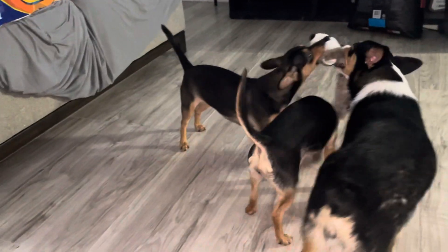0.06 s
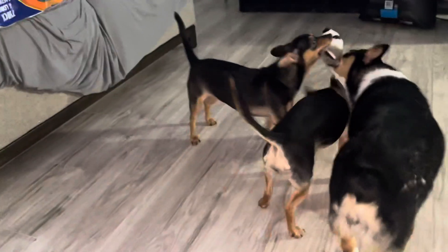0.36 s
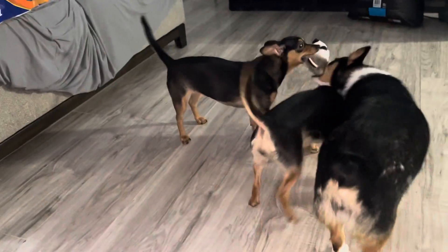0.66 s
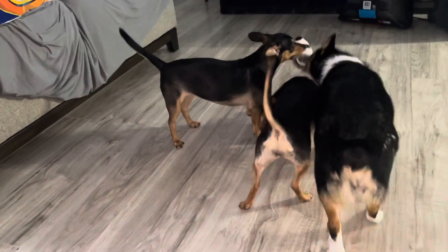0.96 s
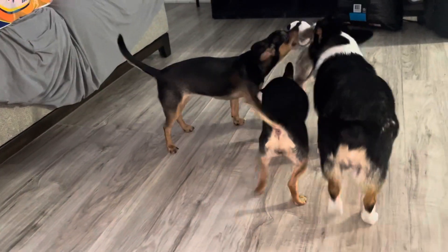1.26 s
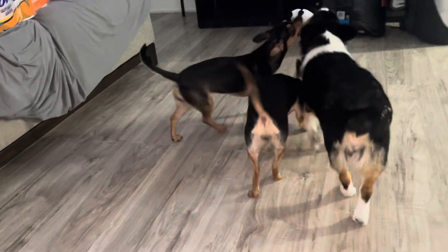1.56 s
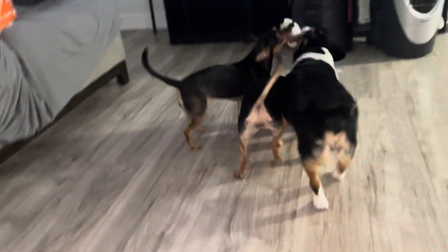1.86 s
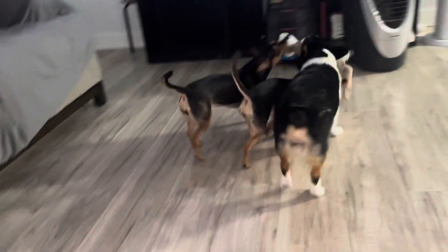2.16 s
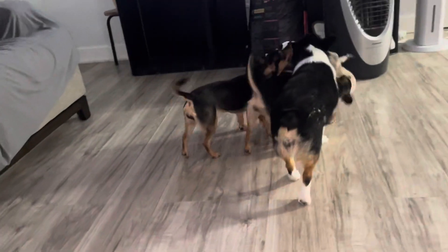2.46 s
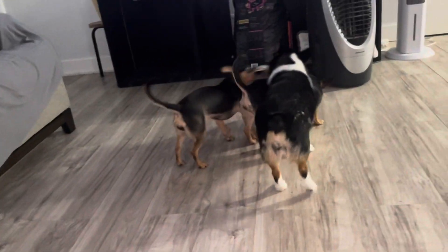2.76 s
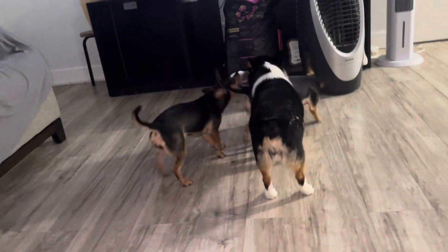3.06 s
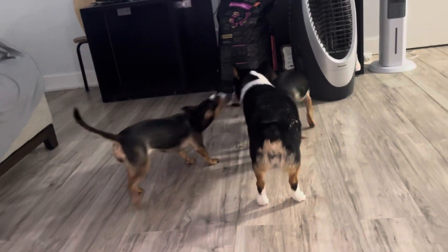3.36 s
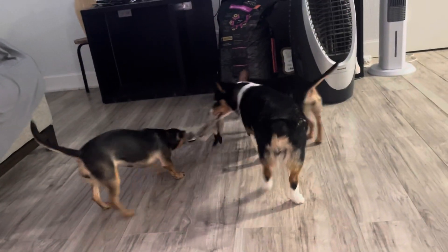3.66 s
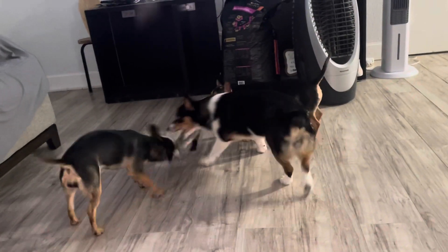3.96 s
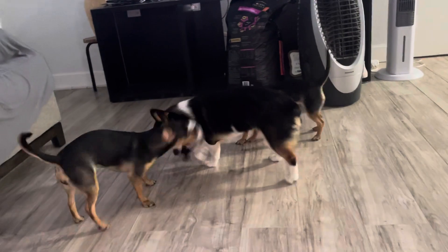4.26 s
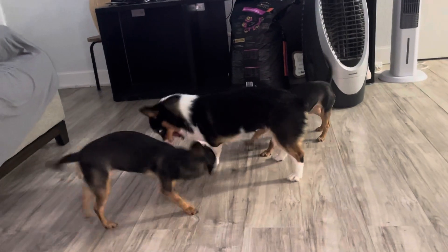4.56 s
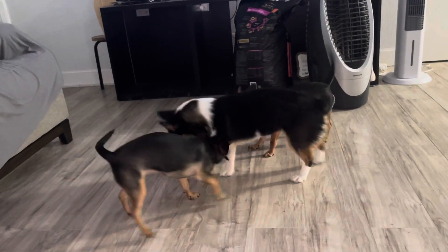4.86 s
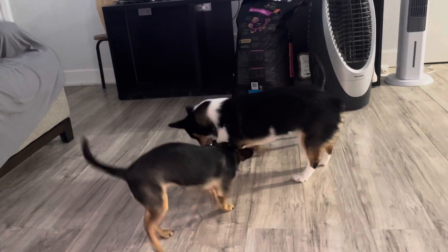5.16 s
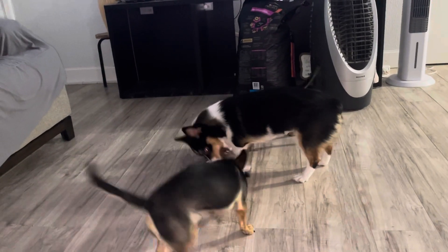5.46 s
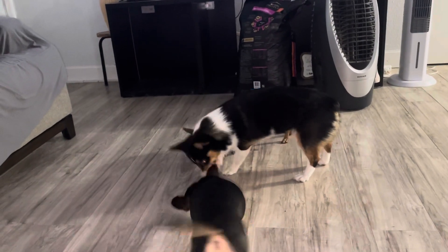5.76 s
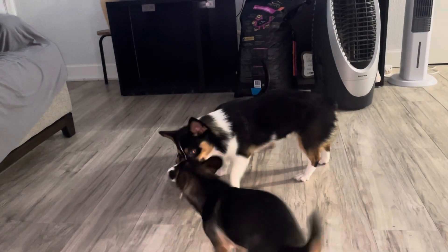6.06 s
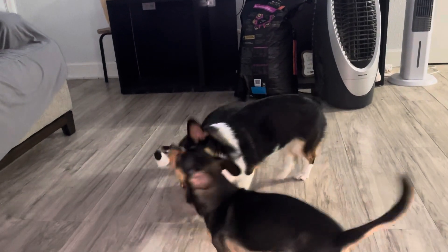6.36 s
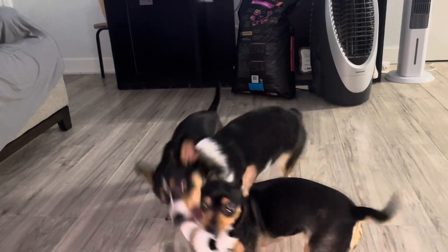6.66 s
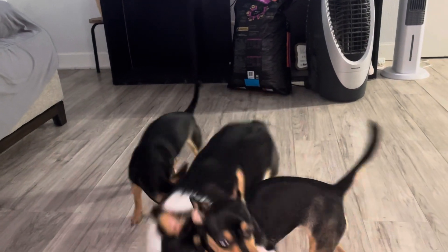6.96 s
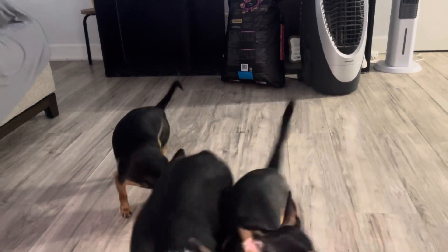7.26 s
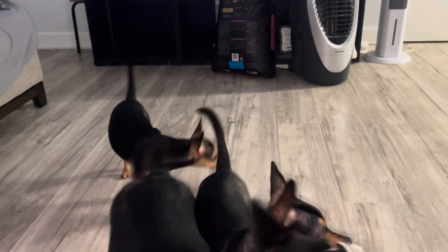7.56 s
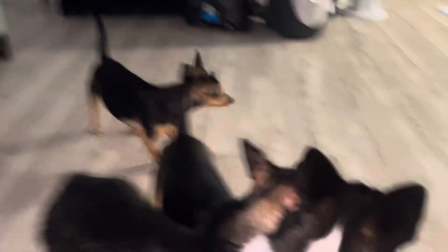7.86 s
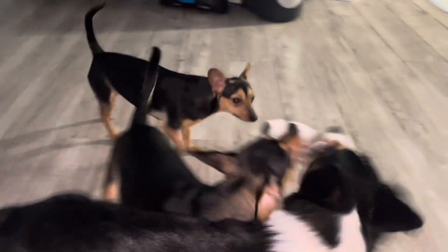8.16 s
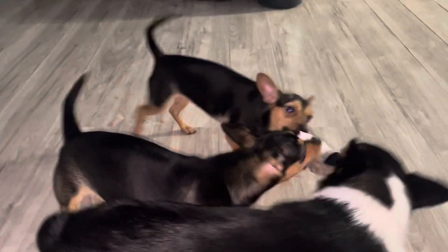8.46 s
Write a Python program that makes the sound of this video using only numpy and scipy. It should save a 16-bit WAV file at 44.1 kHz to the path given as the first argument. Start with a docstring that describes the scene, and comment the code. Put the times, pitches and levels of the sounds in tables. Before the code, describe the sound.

Small dogs' claws tick and skid on a laminate floor as they tug a toy, with one gruff bark over a faint fan hum.

```python
"""Claws tick and skid on a laminate floor as three small dogs tug at a toy.
Nails ring and boards knock at each step, dragged paws stick and slip, paws bump and a pad squeaks.
One dog gives a gruff, snorting bark, its throat chopping a blast of air; faint moans pass closed jaws.
Fur crackles, a soft rustle and a low, throbbing rumble come and go, and a fan hums behind them.
The small room rings briefly, heard through two microphone ports."""
import sys
import numpy as np
from scipy import signal
from scipy.fft import rfft, irfft, next_fast_len
from scipy.io import wavfile
from scipy.ndimage import uniform_filter1d

SR = 44100
rng = np.random.default_rng(int(sys.argv[2]) if len(sys.argv) > 2 else 0)


def transcribe(u):
    """Save the signal u as a 16-bit wav file named by the first command-line argument.

    u: samples, shape (n,) or (channels, n), limited to [-1, 1]; the rate is SR.
    q: integer samples, one column per channel.
    """
    v = np.clip(np.atleast_2d(u).T, -1, 1)
    q = np.round(v * 32767).astype(np.int16)
    wavfile.write(sys.argv[1], SR, q)


N = 380004


def gain_of(db):
    """Decibels to amplitude."""
    return 10 ** (np.asarray(db) / 20)


def unit_rms(x):
    """Scales to an rms of one."""
    return x / np.sqrt(np.mean(x ** 2) + 1e-20)


def drift(count, *windows):
    """Slow noise of unit rms, smoothed over each window length in samples."""
    x = rng.standard_normal(count)
    for size in windows:
        x = uniform_filter1d(x, size)
    return unit_rms(x)


def at_hz(points, hz):
    """Interpolates rows of (Hz, value) on a log frequency axis."""
    f, value = np.transpose(points)
    return np.interp(np.log(hz + 1), np.log(f + 1), value)


def envelope(points):
    """Rows of (s, dB) to a gain per sample."""
    s, db = np.transpose(points)
    return gain_of(np.interp(np.arange(N) / SR, s, db))


def add(mix, start_s, sound):
    """Mixes a sound in at start_s."""
    part = mix[max(round(start_s * SR), 0):][:len(sound)]
    part += sound[:len(part)]


def colour(x, spectrum, size=4096):
    """Causal filter from rows of (Hz, relative dB); white noise keeps its power."""
    log_gain = np.log(gain_of(at_hz(spectrum, abs(np.fft.fftfreq(size, 1 / SR)))))
    taps = np.fft.ifft(np.exp(np.conj(signal.hilbert(log_gain)))).real
    return signal.oaconvolve(x, taps / np.linalg.norm(taps))[:len(x)]


def resonate(x, hz, width_hz, stages=1):
    """Unity-gain resonators in series; the centre may move."""
    carrier = np.exp(2j * np.pi * np.cumsum(hz * np.ones(len(x))) / SR)
    pole = np.exp(-np.pi * width_hz / SR)
    for _ in range(stages):
        x = 2 * (carrier * signal.lfilter([1 - pole], [1, -pole], x / carrier + 1e-18)).real
    return x


# Each row: time in seconds, tick level in dB, nail ring in Hz, knock and crack in dB re tick,
# skid level in dB, fizz in dB re skid. The players add their own trims.
PAW_STEPS = [(.106, -51.5, 6760, -7, 8.5, -50.5, -13), (.388, -47, 6800, -14, -6, -62, -4),
             (.394, -40.5, 7350, -6, -1.5, -46.5, -2.5), (0.509, -39, 7350, -8, -11, -46, -2),
             (.625, -46, 7900, -4, -2, -48, -8), (.713, -51, 8550, -10, -2, -61, 7),
             (0.935, -42, 8440, -15, 3, -52, -10), (0.948, -45.5, 9000, -17, 7, -50, -8),
             (0.953, -41, 6500, 1.5, 2, -58, -10), (0.988, -38, 8800, -1, -2, -46.5, 3),
             (1.004, -36, 8550, -3, -5, -69, 0), (1.094, -47, 4500, -6, -14, -66, -12),
             (1.167, -50, 7550, -12, -1, -61, -2), (1.390, -43, 6940, -5, 4, -46.5, -5),
             (1.431, -44, 7000, -16, -10, -55, -1), (1.564, -36, 7900, -7.5, 0, -42.5, -8),
             (1.635, -39, 6440, -8, -11, -49, -14), (1.658, -48, 6030, -14, -14, -49, -12),
             (1.866, -48, 6500, -14, -4, -53, -10), (1.904, -35.5, 6500, -7, -0.5, -44, -16),
             (2.244, -44, 6960, -10, -11, -54, -16), (2.358, -37, 6030, -14, -14, -64, -10),
             (2.371, -42, 6240, -9, -1, -74, -9), (2.45, -45, 5800, -16, -20, -62, -14),
             (2.613, -33.5, 6060, -12, -24, -45, -17), (2.986, -39, 6340, -9, -8, -56, -8),
             (2.989, -31.5, 5500, -13, -10, -46, -12), (3.005, -43, 6200, -16, -8, -58, -10),
             (3.042, -35.5, 6100, -22, -23, -56, -10), (3.195, -37.5, 5600, -10, -21, -45, -16),
             (3.274, -41, 5960, -20, -16, -56, -12), (3.290, -29.5, 6200, -22, -15, -49.5, 0),
             (3.297, -35.5, 5770, -18, -8, -54, 1), (3.374, -44, 6700, -20, -14, -64, -10),
             (3.387, -39, 7700, -7, -2, -46, -9), (3.439, -43, 6500, -16, -6, -64, -8),
             (3.493, -32.5, 6040, -23, -11, -41, -6), (3.734, -41, 5800, -18, -16, -67, -10),
             (3.751, -34.5, 6200, -9, -5.5, -49, -3), (4.076, -36, 7040, -9, -12, -47.5, 0),
             (4.234, -47, 6200, -20, -8, -74, -11), (4.265, -32, 6840, -12, -16, -42.5, -8),
             (4.268, -30.5, 5950, -8, -11, -47.5, -6), (4.393, -40.5, 6070, -12, -0.5, -44, -9),
             (4.553, -37.5, 7200, -2.5, 3, -55, -4), (4.654, -33.5, 6800, -22, -16, -54, 4),
             (4.748, -34, 6430, -22, -11, -49, -5), (4.755, -43, 5800, -18, -12, -58, -8),
             (4.772, -36.5, 5600, -13, -7, -46, -10), (5.173, -33, 6400, -16, -20, -44, -9),
             (5.182, -35, 7260, -20, 4, -59, -2), (5.197, -35.5, 7100, -7, 1, -42, 0.5),
             (5.350, -48, 7500, -8, 11.5, -43.5, -2.5), (5.548, -39.5, 5700, -7, -18, -45, -20),
             (5.576, -40, 5350, -18, -10, -53, -10), (5.593, -38.5, 7300, -6, 1, -45, 4.5),
             (5.603, -45, 9700, -10, -2, -56, -2), (5.934, -45, 5960, -10, -7, -59, -6),
             (6.09, -34.5, 10800, -7, -6, -43.5, 1), (6.096, -35, 9700, -6, -2, -59, -1),
             (6.245, -46.5, 8550, -11, 9, -62, 4), (6.395, -40, 9600, -18, 0, -62, -11),
             (6.408, -22.5, 8360, -21, -1, -41, 2), (6.419, -43, 5200, -14, -12, -49, -4),
             (6.488, -44, 6860, -13, -2, -42.5, -6), (6.547, -30.5, 8400, -2, -4, -41, 2.5),
             (6.615, -50, 10100, -10, 4, -56, -2), (6.647, -52, 9500, -14, 9, -68, -3),
             (6.798, -44.5, 9100, -20, 1, -45, -6), (6.863, -41.5, 7400, -9, 8, -42.5, -6),
             (6.893, -44, 7900, -5, 1, -52.5, 5), (6.971, -46, 5800, -14, -12, -64, -10),
             (7.071, -42.5, 10600, -15, 2, -60, 1), (7.078, -46, 10500, -14, 6, -55, 0),
             (7.142, -39.5, 9500, 4, 3, -52, 14), (7.379, -41.5, 6100, -6, 1, -42, -4),
             (7.391, -41.5, 7000, -14, 7, -48, -13), (7.781, -51, 7700, 1, 3, -51, -2),
             (7.812, -52, 5960, -1, -6, -54, -1), (8.143, -54, 8050, -4, 9, -49.5, -5),
             (8.22, -49, 5500, -3, -1, -44.5, -9), (8.239, -47, 6000, -13, -3, -56, -2),
             (8.308, -45, 7650, 0, -8, -44, 2.5), (8.422, -37, 4260, 0.5, -15, -46.5, -19)]
# Each row: frequency in Hz, relative level in dB.
CRACK_SPECTRUM = [(500, -15), (3000, -4), (5000, 7), (10500, 6.5), (13500, -2), (16000, -0.5)]


def claws(trim_db=-1.5, knock_trim_db=-4, knock_s=0.0011, ring_q=5.5):
    """Claws graze, snap down and chatter. Returns the nail and board ring, and the stereo crack."""
    chatter, graze_s, chatter_s = 0.17, 0.0006, 0.0012
    ring, cracks = np.zeros(N), np.zeros((2, N))
    t = np.arange(-96, 1024) / SR
    touch = np.exp(np.minimum(t / graze_s, -t / chatter_s))
    tick_norm = np.sqrt(SR / 440)  # energy of 2.3 ms at unit rms
    for s, db, hz, knock_db, crack_db in claw_hits():
        skips, wood = rng.standard_normal((2, len(t)))
        lean_db = rng.uniform(-1.19, 1.645)  # each claw lands at its own place
        # a blunt claw cracks less and chatters more
        contact = (t == 0) + chatter * gain_of(-crack_db) * skips * touch
        nail = resonate(contact, hz, hz / ring_q, stages=2)
        crack = colour(contact, CRACK_SPECTRUM, size=512)
        knock = colour(wood * (t >= 0) * np.exp(-abs(t) / knock_s), SCUFF_SPECTRUM, size=512)
        routes = [(ring, nail, 0), (ring, knock, knock_db + knock_trim_db),
                  (cracks[0], crack, crack_db + lean_db), (cracks[1], crack, crack_db - lean_db)]
        for mix, part, part_db in routes:
            add(mix, s + t[0], tick_norm * gain_of(db + trim_db + part_db) * part / np.linalg.norm(part))
    return ring, cracks


def claw_hits(lag_s=0.009, second_db=-17, detune=0.037):
    """Each step lands one claw, then a lighter one."""
    for s, db, hz, knock_db, crack_db, _, _ in PAW_STEPS:
        late, sharp = rng.uniform(-1, 1, 2)
        yield s, db, hz, knock_db, crack_db
        yield s + lag_s * (1 + late / 2), db + second_db, hz * (1 + detune * sharp), knock_db, crack_db


# Each row: peak time in seconds, length in seconds, level in dB, scuff and fizz in dB re that level.
PAW_DRAGS = [(0.771, 0.073, -48, -5, -6), (.905, 0.051, -53, -12, -4), (1.08, 0.17, -47, -7, -24),
             (1.213, 0.097, -47.5, -3.5, -1), (1.721, 0.078, -38, -5, -1.5), (1.962, 0.071, -43, -16, -5),
             (2.106, 0.12, -46.5, -5, -8), (2.299, 0.29, -44.5, -8.5, -10), (2.665, 0.057, -51.5, -3, -16),
             (3.157, 0.04, -48, -18, -9), (3.49, .026, -40, -24, -14), (3.696, 0.099, -42, -23, -11),
             (3.936, 0.029, -53, -8, -4), (4.012, 0.14, -41, -10, -32), (4.462, 0.063, -48.5, -5, -3),
             (4.62, 0.18, -41, -14, -7), (4.835, 0.045, -50, -16, -14), (5.05, 0.035, -52, -5, -12),
             (5.107, .035, -59, -12, 7), (5.159, 0.034, -49, -16, -19), (5.495, 0.086, -47.5, -9, -4),
             (5.786, 0.048, -41.5, -11, 0), (5.952, 0.026, -45.5, -17, -9), (6.007, .025, -47.5, -16, -14),
             (6.085, 0.071, -42, -27, -18), (6.186, 0.072, -47, -20, -10), (6.261, 0.078, -46.5, -11, -4),
             (6.761, 0.024, -49, -11, -21), (7.036, 0.13, -49, -6.5, -6), (7.167, 0.079, -42, -24, -4),
             (7.228, 0.15, -49, 4.5, -23), (7.443, .07, -52, 2, -8), (7.574, 0.11, -40.5, 3, -4),
             (7.825, 0.043, -43, -1.5, -19), (8.196, 0.041, -53, -12, -8), (8.347, 0.087, -48, -3.5, -5),
             (8.454, 0.1, -43, -29, -11)]


def strokes(skid_rise_s=0.0016, skid_fall_s=0.034, rise_share=0.42):
    """A short skid after each step, then the longer drags. A heavier knock scuffs more."""
    for s, _, _, knock_db, _, skid_db, fizz_db in PAW_STEPS:
        yield s + skid_rise_s, skid_rise_s, skid_fall_s, skid_db, knock_db, fizz_db
    for peak_s, length_s, db, scuff_db, fizz_db in PAW_DRAGS:
        yield peak_s, length_s * rise_share, length_s * (1 - rise_share), db, scuff_db, fizz_db


# Bright skid, dull scuff and fine fizz. Each row: frequency in Hz, relative level in dB.
SKID_SPECTRUM = [(500, -58), (1500, -36), (2400, -16), (3400, -2.5), (4100, 1.5), (4900, 5), (5900, 1),
                 (6800, 5), (8300, -7), (10000, -4), (13000, -20.5), (16000, -39.5)]
SCUFF_SPECTRUM = [(150, -41), (700, 8.5), (1500, 3), (2300, 11), (3200, 8), (5000, -26), (12000, -53)]
FIZZ_SPECTRUM = [(3000, -7), (7000, -4.5), (9500, 11), (11500, 5), (13500, 0), (15000, -8.5)]


def scrapes(edge_db=-10, skid_trim_db=-3, scuff_trim_db=-3, fizz_trim_db=-4):
    """Claws and pads stick and slip over the grain, swelling and easing with each stroke."""
    forces = np.zeros((3, N))
    for peak_s, rise_s, fall_s, db, scuff_db, fizz_db in strokes():
        t = np.arange(-rise_s, fall_s, 1 / SR)
        swell_db = np.interp(t, [-rise_s, 0, fall_s], [edge_db, 0, edge_db])
        stroke = gain_of(db + swell_db) * signal.windows.tukey(len(t), 0.08)
        bands_db = skid_trim_db, scuff_db + scuff_trim_db, fizz_db + fizz_trim_db
        for force, band_db in zip(forces, bands_db):
            add(force, peak_s - rise_s, stroke * gain_of(band_db))
    catch_db = 0.94 * drift(N, 260)  # the pad catches every few milliseconds
    skid, scuff, fizz = forces * unit_rms(grit(per_s=900, spread_db=2) * gain_of(catch_db))
    friction = colour(skid, SKID_SPECTRUM) + colour(scuff, SCUFF_SPECTRUM) + colour(fizz, FIZZ_SPECTRUM)
    return nail_rings(skid) + friction


def grit(per_s, spread_db):
    """Tiny slips of uneven size over an even hiss."""
    slips = (rng.random(N) < per_s / SR) * rng.standard_normal(N)
    slips *= gain_of(spread_db * np.minimum(rng.exponential(1, N), 3))
    return unit_rms(unit_rms(slips) + rng.standard_normal(N))


def nail_rings(drive, gain_db=8.5, modes_hz=(4750, 6200), wander=0.132, width_hz=130):
    """Dragged nails ring in narrow bands that wander as the grip shifts."""
    centres_hz = [hz * (1 + wander * drift(N, 2000, 1000)) for hz in modes_hz]
    return gain_of(gain_db) * sum(resonate(drive, hz, width_hz) for hz in centres_hz)


# Each row: time in seconds, effort in dB, flap rate in Hz, mouth opening as a factor on the formants.
BARK_CONTOUR = [(7.534, -43, 128.6, 0.95), (7.561, -42, 130.4, 1.02), (7.565, -26.5, 130.8, 0.93),
                (7.585, -31.5, 117.8, 1.015), (7.605, -28.5, 124.7, 1.09), (7.623, -32, 116, 0.995),
                (7.653, -38.5, 100.7, 0.93), (7.723, -47, 90.4, 0.95)]
# Each row: centre in Hz, width in Hz, gain in dB.
THROAT_FORMANTS = [(215, 200, -2.5), (330, 120, 1.5), (560, 110, 0.5), (997, 118, 6.5), (1166, 210, 2),
                   (2190, 340, 0), (3770, 1040, -6.5), (5060, 1900, -10.5)]


def bark(rough=0.79, jitter=0.2, puff_cycles=0.64, trim_db=-1, spray_db=-16):
    """Uneven flaps of the throat chop a blast of air, which rings in the opening mouth."""
    times_s, *columns = np.transpose(BARK_CONTOUR)
    t = np.arange(times_s[0], times_s[-1], 1 / SR)
    effort_db, flap_hz, mouth = (np.interp(t, times_s, column) for column in columns)
    cycles = np.cumsum(flap_hz * (1 + jitter * drift(len(t), 300))) / SR + 0.55
    flaps = np.diff(np.floor(cycles), prepend=0)
    puffs = (0.59 + np.exp(-(cycles % 1) / puff_cycles)) * rng.standard_normal(len(t))
    drive = (1 - rough) * unit_rms(flaps) + rough * unit_rms(puffs)
    # neighbouring resonances alternate in sign, as in a tube
    voice = sum((-1) ** k * gain_of(db) * resonate(drive, hz * mouth, width_hz)
                for k, (hz, width_hz, db) in enumerate(THROAT_FORMANTS))
    spray = colour(puffs, [(1000, -27), (4500, -6), (8000, -2), (12500, 5), (15000, 0)], size=512)
    snort = unit_rms(voice) + gain_of(spray_db) * unit_rms(spray)
    out = np.zeros(N)
    add(out, times_s[0], gain_of(effort_db + trim_db) * snort)
    return out


def bark_gust():
    """The bark's air hits the ports as a deep flutter, slightly different at each."""
    spectrum = [(20, -17), (38, 17), (70, 18), (200, -27), (1000, -70)]
    mid, side = (colour(noise, spectrum) for noise in rng.standard_normal((2, N)))
    blast = envelope([(7.55, -110), (7.6, -49), (7.8, -55), (8.1, -55), (8.6, -99)])
    return blast * (mid + 0.2 * np.array([side, -side]))


# Each row: start in seconds, peak in dB, first and final pitch in Hz, glide and pulse time in seconds.
# The loudest row opens the bark.
THUMPS = [(.521, -48, 560, 290, 0.0046, 0.016), (.985, -43, 720, 520, .004, 0.0068),
          (2.625, -47, 700, 500, 0.0037, 0.0044), (3.119, -48, 296, 215, 0.0046, 0.014),
          (3.322, -42.5, 750, 450, 0.0025, 0.0036), (3.557, -54, 320, 230, 0.0037, .013),
          (3.578, -48, 650, 480, 0.0022, .006), (3.908, -49.5, 290, 208, .004, .014),
          (7.001, -37, 1000, 600, 0.0018, 0.0011), (7.227, -49, 330, 231, 0.0057, .016),
          (7.562, -26, 626, 427, 0.004, 0.0088), (7.812, -37.5, 830, 680, 0.0031, 0.0059),
          (7.878, -47, 330, 256, 0.0078, 0.01), (7.933, -46.5, 269, 197, 0.0066, 0.03),
          (8.183, -33, 1110, 120, 0.0029, 0.006)]


def thumps():
    """Soft bumps and the bark's opening thump: a few cycles sinking in pitch."""
    out, t = np.zeros(N), np.arange(2048) / SR
    for start_s, db, first_hz, final_hz, glide_s, pulse_s in THUMPS:
        hz = final_hz + (first_hz - final_hz) * np.exp(-t / glide_s)
        age = 2 * t / pulse_s  # the level peaks at age 1
        add(out, start_s, gain_of(db) * age * np.exp(1 - age) * np.sin(2 * np.pi * np.cumsum(hz) / SR))
    return out


# Each row: start and end in seconds, level in dB, centre in Hz.
PAD_SQUEAKS = [(1.065, 1.094, -50.5, 1954), (1.084, 1.104, -55, 2750), (1.087, 1.1, -49, 3800)]


def squeaks(width_hz=600):
    """Uneven slips of a pad on the boards ring in a broad, raspy band."""
    out = np.zeros(N)
    for start_s, end_s, db, hz in PAD_SQUEAKS:
        count = len(np.arange(start_s, end_s, 1 / SR))
        rasp = resonate(rng.standard_normal(count), hz, width_hz, stages=2)
        add(out, start_s, gain_of(db) * unit_rms(rasp * signal.windows.tukey(count, 0.7)))
    return out


# Each row: start and end in seconds, level in dB, pitch in Hz.
DOG_MOANS = [(1.088, 1.165, -51.5, 246), (1.581, 1.682, -52, 242.5), (1.78, 2.0, -53, 179.4),
             (1.86, 2.03, -55, 240.7)]


def moans(waver=0.027):
    """Faint, wavering, nearly pure notes through closed jaws."""
    out = np.zeros(N)
    for start_s, end_s, db, hz in DOG_MOANS:
        count = len(np.arange(start_s, end_s, 1 / SR))
        pitch_hz = hz * (1 + waver * drift(count, 300))
        tone = np.sin(2 * np.pi * np.cumsum(pitch_hz) / SR)
        add(out, start_s, gain_of(db) * unit_rms(tone * signal.windows.tukey(count, 0.7)))
    return out


# Each row: time in seconds, level in dB.
FUR_LEVELS = [(0, -65.5), (.4, -69), (.8, -62), (2.2, -71), (2.85, -67), (3.4, -57.5), (4, -64), (6, -61.5),
              (7.75, -55.5), (8, -65.5), (8.3, -59.5), (8.62, -61)]


def fur(trim_db=-1, flicker_db=3):
    """Coats and toy brush together in a fine, fitful crackle."""
    touch = gain_of(trim_db + flicker_db * drift(N, 1200, 500))
    return touch * envelope(FUR_LEVELS) * colour(grit(per_s=1200, spread_db=4.5), SKID_SPECTRUM)


# Each row: peak time in seconds, level in dB, rise and fall in seconds.
RUSTLE_SWELLS = [(0, -54, .2, 0.26), (1.02, -48, 0.38, 0.38), (2.02, -48, 1, 0.18), (3.2, -55.5, 0.4, 0.65),
                 (5.38, -49.5, 0.34, 0.16), (7.85, -51, 0.11, 0.44)]
# Each row: frequency in Hz, relative level in dB.
RUSTLE_SPECTRUM = [(60, -38), (160, -3), (245, -3.5), (300, -4), (385, 0.5), (450, -5), (520, -5),
                   (700, -6.5), (835, -1), (950, -14.5), (1250, -8.5), (1600, -23), (2500, -35),
                   (9000, -43)]


def rustle():
    """Moving bodies rustle, each swell following a bell curve."""
    t, swells = np.arange(N) / SR, []
    for peak_s, db, rise_s, fall_s in RUSTLE_SWELLS:
        from_peak = np.maximum((peak_s - t) / rise_s, (t - peak_s) / fall_s)
        swells.append(gain_of(db) * np.exp(-np.minimum(from_peak, 10) ** 2))
    return np.max(swells, axis=0) * diffuse_noise(RUSTLE_SPECTRUM)


# Each row: centre time in seconds, peak in dB, pitch in Hz.
LOW_THROBS = [(.319, -40, 108), (.435, -40, 103), (0.515, -35, 106), (0.561, -37, 99), (0.704, -37.5, 110),
              (0.875, -40, 119), (1.205, -32.5, 103), (1.285, -35, 113), (1.761, -35, 121),
              (1.868, -51, 116), (1.932, -31.5, 118), (1.961, -33, 124), (3.441, -41, 109),
              (3.99, -43, 110), (4.677, -34, 112), (4.747, -39, 113), (4.842, -37, 115), (4.929, -38, 122),
              (4.979, -35.5, 111), (5.045, -42, 127), (5.129, -34, 102), (5.218, -37, 110),
              (5.28, -34, 101), (5.35, -43, 116), (5.395, -35.5, 120), (7.366, -38, 111), (7.439, -38, 106),
              (7.595, -38, 105)]


def throbs(length_s=0.038, waver=0.079):
    """Single throbs stand out of the rumble, each a few deep, uneven cycles."""
    out, t = np.zeros(N), np.arange(-length_s / 2, length_s / 2, 1 / SR)
    swell = np.cos(np.pi * t / length_s) ** 2
    for centre_s, db, hz in LOW_THROBS:
        wobble = drift(len(t), 300)
        cycles = hz * (t + waver * np.cumsum(wobble - wobble.mean()) / SR)
        add(out, centre_s - length_s / 2, gain_of(db) * swell * np.cos(2 * np.pi * cycles))
    return out


# Each row: start and end in seconds, level in dB.
RUMBLE_BOUTS = [(0, 0.372, -49.5), (0.332, 1.572, -46), (1.69, 1.996, -45), (4.67, 5.454, -48.5),
                (7.213, 7.608, -50)]
# Each row: frequency in Hz, relative level in dB.
RUMBLE_SPECTRUM = [(25, -33.5), (55, -25.5), (80, 0), (92, -11), (112, 5), (132, -3.5), (160, -14),
                   (260, -29), (600, -43), (4000, -81)]


def rumble(trim_db=-1, rest_db=-54, edge_s=0.03, throb_hz=6.9, throb_db=2.5):
    """A low room rumble throbs unevenly in bouts over a quiet resting level."""
    t = np.arange(N) / SR
    bouts = [gain_of(db) * np.clip(np.minimum(t - start_s, end_s - t) / edge_s + 0.5, 0, 1)
             for start_s, end_s, db in RUMBLE_BOUTS]
    pace_hz = throb_hz * (1 + 0.287 * drift(N, 6000))
    throb = unit_rms(gain_of(throb_db * np.sin(2 * np.pi * np.cumsum(pace_hz) / SR)))
    strength = np.hypot(gain_of(rest_db), throb * np.linalg.norm(bouts, axis=0))
    return gain_of(trim_db) * strength * diffuse_noise(RUMBLE_SPECTRUM)


# Each row: frequency in Hz, relative level in dB.
FAN_SPECTRUM = [(20, -38), (45, -14.5), (80, -0.5), (112, -7.5), (160, -14), (300, -15), (600, -15.5),
                (1100, -16.5), (1600, -18.5), (2300, -17.5), (3500, -25), (6000, -35), (10000, -99),
                (16000, -62)]
# Each row: pitch in Hz, level in dB.
FAN_HUM = [(110, -59.5), (242, -68.5), (388, -72), (834, -68)]


def fan(air_db=-51.5, width_hz=14.7):
    """Steady fan air with faint, wavering tones."""
    flow = rng.standard_normal(N)
    hum = sum(gain_of(db) * unit_rms(resonate(flow, hz, width_hz, stages=2)) for hz, db in FAN_HUM)
    return gain_of(air_db) * diffuse_noise(FAN_SPECTRUM) + hum


# Each row: frequency in Hz, coherence between the ports from 0 to 1.
PORT_COHERENCE = [(130, .998), (250, .99), (400, .94), (600, .72), (1000, .6), (1600, .5), (3000, .66),
                  (4500, .8), (7000, .7), (8300, .93), (13000, .6), (15000, .9)]


def diffuse(pair):
    """Makes two unrelated signals as alike as sound from all sides is at the ports."""
    size = next_fast_len(pair.shape[1])
    left, other = rfft(pair, size)
    coherence = at_hz(PORT_COHERENCE, np.fft.rfftfreq(size, 1 / SR))
    right = coherence * left + np.sqrt(1 - coherence ** 2) * other
    return irfft(np.array([left, right]), size)[:, :pair.shape[1]]


def diffuse_noise(spectrum):
    """Coloured noise arriving from all sides."""
    return diffuse(np.array([colour(noise, spectrum) for noise in rng.standard_normal((2, N))]))


# Each row: frequency in Hz, time to fall 60 dB in seconds.
ROOM_T60 = [(100, 0.62), (500, 0.5), (2200, 0.7), (5500, 0.54), (9000, 0.25), (15000, 0.52)]


def room(x, wet_db, onset_s=0.00014, count=2600, per_s=4000):
    """Direct sound plus sparse reflections of random sign, each band dying at its own rate."""
    taps = np.zeros((2, SR))
    arrivals = np.arange(count) * SR // per_s + rng.integers(0, SR // per_s, (2, count))
    np.put_along_axis(taps, arrivals, rng.choice([-1., 1.], arrivals.shape), 1)
    taps *= np.clip(np.arange(SR) / SR / onset_s - 0.5, 0, 1)
    hz, t, bands = signal.stft(taps, SR, nperseg=256)
    bands *= gain_of(-60 * t / at_hz(ROOM_T60, hz)[:, None])
    tail = diffuse(signal.istft(bands, SR, nperseg=256)[1])
    tail /= np.linalg.norm(tail[0])
    return x + gain_of(wet_db) * signal.oaconvolve(x[None], tail, axes=1)[:, :N]


def scene():
    """The dogs in the room over the background; the claws' thin crack arrives direct."""
    ring, cracks = claws()
    paws = cracks + room(ring, wet_db=-10) + room(scrapes() + fur() + squeaks(), wet_db=-4)
    dogs = room(thumps(), wet_db=-27) + room(bark() + moans(), wet_db=-4)
    return paws + dogs + bark_gust() + rustle() + throbs() + rumble() + fan()


# Each row: frequency in Hz, phase lead of the left port in radians.
LEFT_LEAD_RAD = [(0, 0), (500, 0), (800, -.35), (1600, -.3), (2900, .35), (4000, .1), (5800, 0),
                 (7000, -1.5), (8150, -3.14), (9500, -4.4), (10600, -5.8), (12800, -6.8), (14000, -9.3),
                 (16000, -9.5)]
# Each row: frequency in Hz, left minus right level in dB.
LEFT_EXCESS_DB = [(350, 0), (700, 1.8), (1400, 1.2), (1720, -2), (2000, 2.8), (5000, 1.6), (7500, 0)]


def record(dry, cutoff_hz=16100):
    """The two ports colour phase and level in opposite senses; a low-pass follows."""
    size = next_fast_len(N + 4096)
    hz = np.fft.rfftfreq(size, 1 / SR)
    lead_rad = np.interp(hz, *np.transpose(LEFT_LEAD_RAD))
    left = np.exp(0.5j * lead_rad) * gain_of(at_hz(LEFT_EXCESS_DB, hz) / 2)
    ports = irfft(rfft(dry, size) * np.array([left, 1 / left]), size)[:, :N]
    lowpass = signal.firwin(255, cutoff_hz, window=("kaiser", 9), fs=SR)
    return signal.oaconvolve(ports, lowpass[None], "same")


dry = scene()
out = record(dry)
transcribe(out)
```